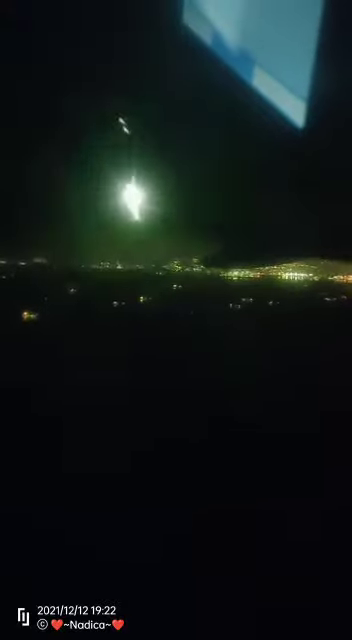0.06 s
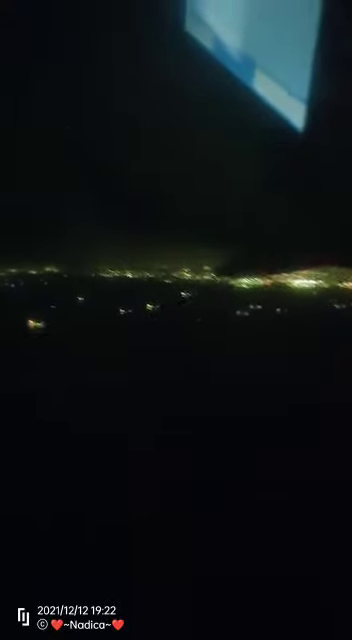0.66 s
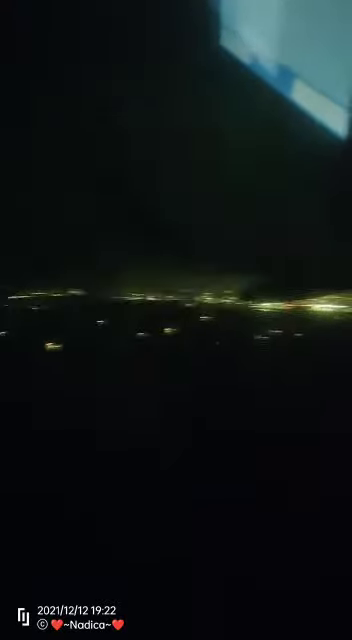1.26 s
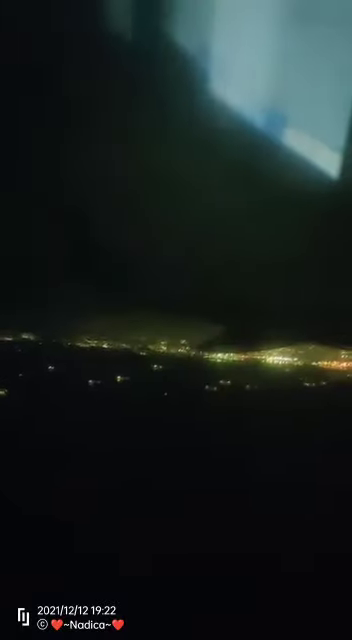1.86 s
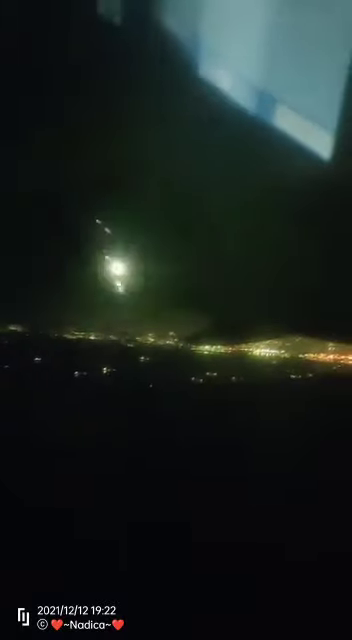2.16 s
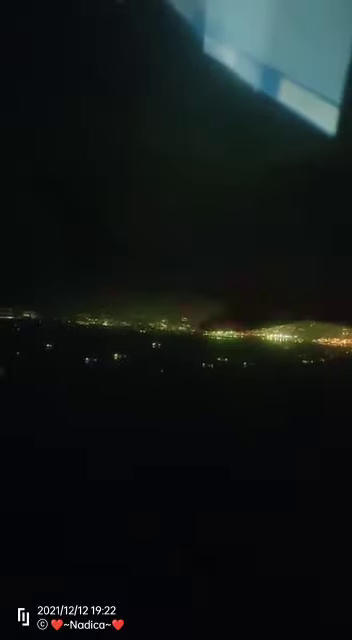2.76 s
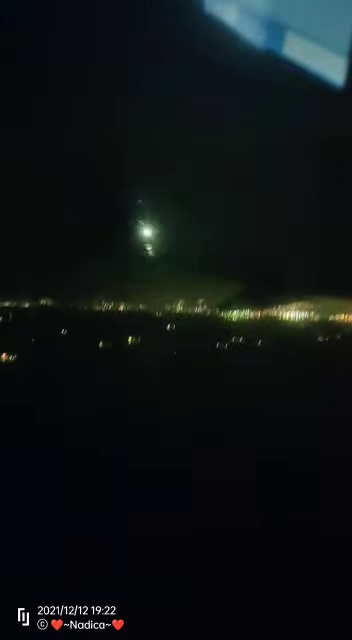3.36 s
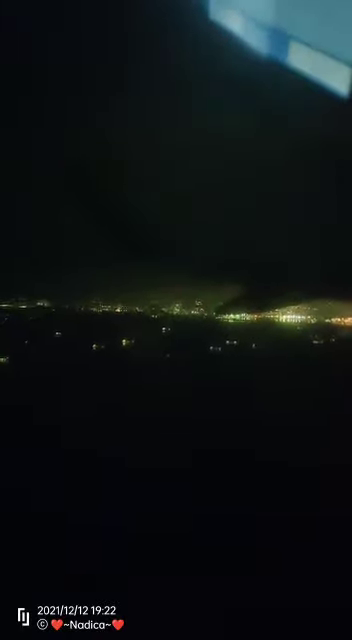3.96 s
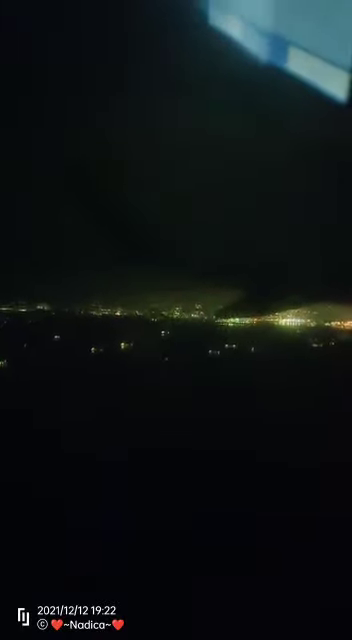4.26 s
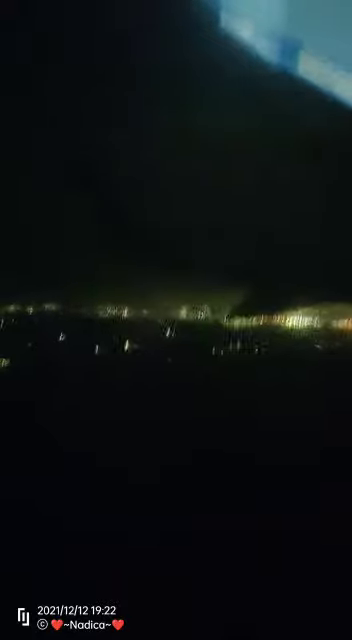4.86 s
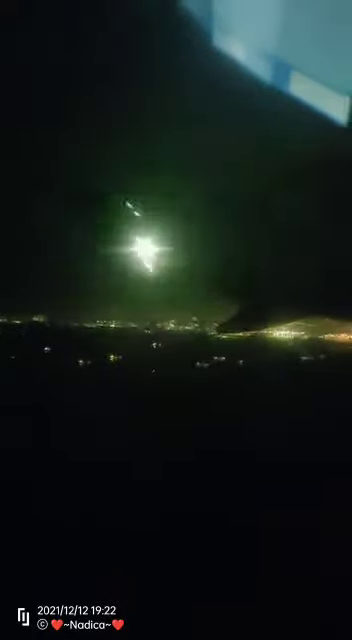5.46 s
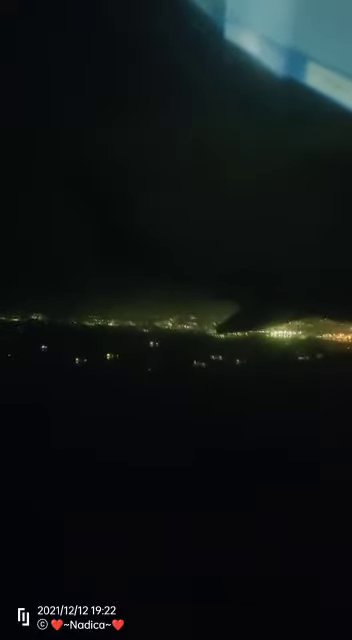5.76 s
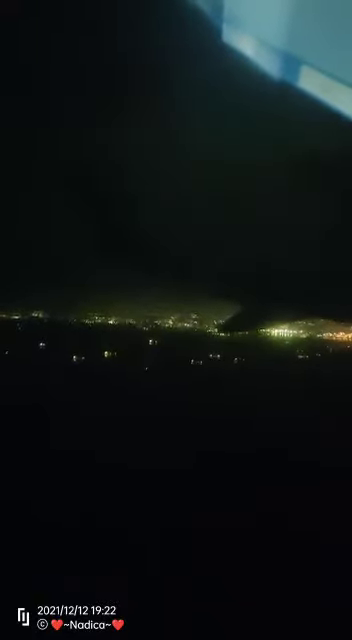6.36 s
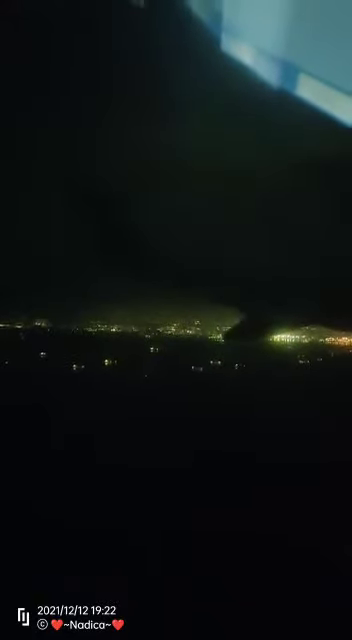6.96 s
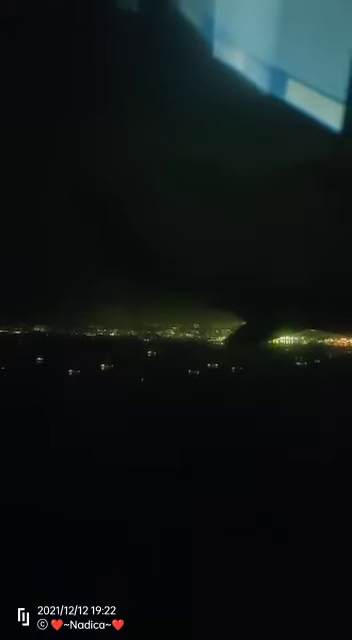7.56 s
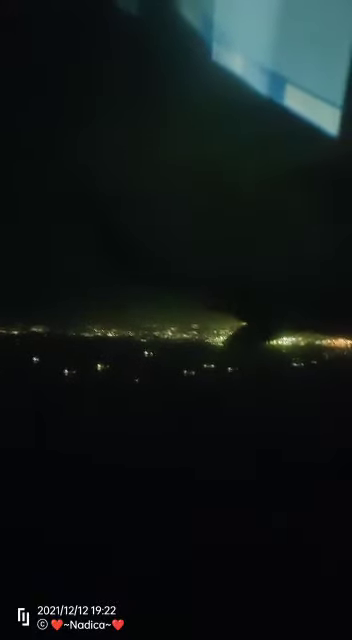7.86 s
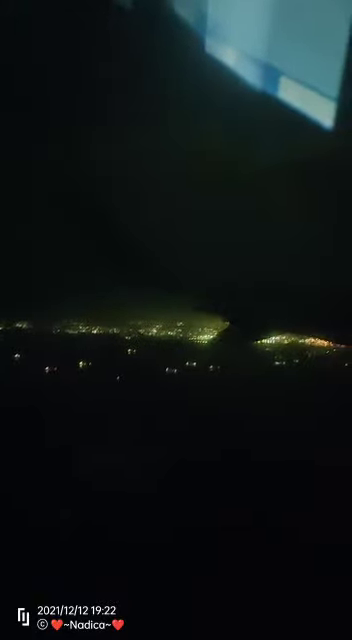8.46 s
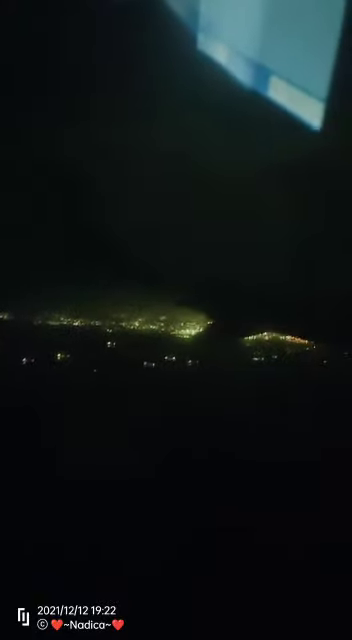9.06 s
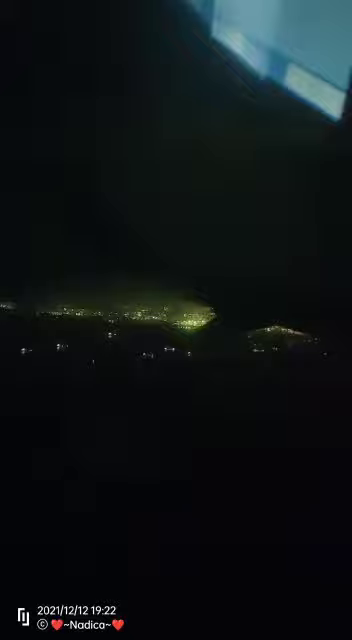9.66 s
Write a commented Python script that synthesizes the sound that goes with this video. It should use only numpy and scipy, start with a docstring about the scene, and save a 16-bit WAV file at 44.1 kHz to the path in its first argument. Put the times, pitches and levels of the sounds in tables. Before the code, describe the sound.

A low, steady engine roar fills an airliner cabin, heard from a window seat along with hissing vents and a faint hum. Midway comes a quick double click of hard plastic close by, followed by light hand brushes, a soft bump and a faint rustle of clothing. The air rushing past on the right swells a little and later whistles softly.

```python
"""Night flight at a window seat

The engines rumble through the airliner's body and hum faintly. Air hisses from the vents and rushes
along the outside, where it swells and later starts to whistle softly. Around halfway, fingertips tick
and hard plastic clicks close by, then a hand brushes and bumps lightly and cloth rustles faintly."""
import sys
import numpy as np
from scipy import signal
from scipy.fft import rfft, irfft, next_fast_len
from scipy.io import wavfile
from scipy.ndimage import uniform_filter1d, map_coordinates

SR = 44100
rng = np.random.default_rng(int(sys.argv[2]) if len(sys.argv) > 2 else 0)


def master_out(mix):
    """Clip the mix to full scale and print it as 16-bit PCM to the path in sys.argv[1]."""
    frames = np.transpose(np.atleast_2d(mix))
    ceiling = np.clip(frames, -1, 1)
    pcm = np.round(ceiling * 32767).astype(np.int16)
    wavfile.write(sys.argv[1], SR, pcm)


N = 427769
TIME = np.arange(N) / SR  # seconds
TOP_HZ = 15700  # where the treble ends


def amp(db):
    """Turns decibels into a number to multiply by."""
    return 10 ** (np.asarray(db) / 20)


def unit(x):
    """Scales a sound to an average (rms) strength of 1."""
    return x / np.sqrt(np.mean(x ** 2) + 1e-20)


def along(points, hz):
    """Reads between a table's rows of frequency and value, on a scale of octaves."""
    f, v = np.transpose(points)
    return np.interp(np.log(hz + 1), np.log(f + 1), v)


def curves(rows):
    """Joins timed rows with straight lines: one curve for each column after the time."""
    times, *columns = np.transpose(rows)
    return [np.interp(TIME, times, column) for column in columns]


def wobble(rate):
    """A smooth random curve through `rate` points a second."""
    return map_coordinates(rng.standard_normal(int(N * rate / SR) + 4), [TIME * rate])


def bell(middle_s, half_s):
    """A smooth rise to 1 and fall around a moment."""
    return np.exp(-2 * ((TIME - middle_s) / half_s) ** 2)


def bursts(rows, fade_s):
    """Sudden jumps in level, each falling 60 dB in fade_s seconds."""
    return sum((TIME >= s) * amp(db - 60 * np.abs(TIME - s) / fade_s) for s, db in rows)


def filtered(x, response):
    """Turns each frequency of a sound up or down by response(hz)."""
    size = next_fast_len(N + SR // 2)
    return irfft(rfft(x, size) * response(np.fft.rfftfreq(size, 1 / SR)), size)[..., :N]


def humps(resonances, hz):
    """The lift in dB around resonances, the pitches at which something likes to ring."""
    return sum(db / (1 + (2 * (hz - centre) / width) ** 2) for centre, width, db in resonances)


def pan(lean_db):
    """Left and right gains: a positive lean is louder on the left."""
    return amp(np.array([[.5], [-.5]]) * lean_db)


# How alike left and right sound; they oppose where half a wave fits between them.
# Each row: frequency in Hz, likeness from -1 (opposite) to 1 (the same).
LIKENESS = [(60, .99), (130, .99), (290, .93), (520, .75), (640, .35), (880, .3), (1030, .45), (1190, -.38),
            (1620, -.35), (1780, .17), (2500, .17), (3200, -.07), (4200, .08), (15000, .02)]
# Which side is louder. Each row: frequency in Hz, left minus right in dB.
SIDE_LEAN = [(50, 0), (120, 0), (250, 1.5), (450, 1), (580, 3.5), (700, 1), (910, -0.2), (1030, 3.5),
             (1140, 0), (1250, 3.5), (1420, -.5), (2070, -2), (2290, 3.5), (2650, 0.5), (3400, -6.5),
             (4100, -4), (4600, -6), (8000, -3), (15000, -1.5)]
def cabin_noise(colour):
    """Noise all around, shaped by colour(hz) in dB: alike on both sides in the bass, not in the treble."""
    def mid_and_side(hz):
        angle = np.arccos(np.clip(along(LIKENESS, hz), -1, 1)) / 2
        return amp(colour(hz)) * [np.cos(angle), np.sin(angle)]
    mid, side = filtered(rng.standard_normal((2, N)), mid_and_side)
    left_right = np.array([mid + side, mid - side])
    return unit(filtered(left_right, lambda hz: pan(along(SIDE_LEAN, hz))))


def table_noise(shape, resonances=()):
    """Cabin noise shaped by a table of frequencies and levels, plus any resonances."""
    return cabin_noise(lambda hz: along(shape, hz) + humps(resonances, hz))


def steadied(x, evenness):
    """Partly evens out the slow swells of a noise, as in a steadily driven vibration."""
    power = np.abs(uniform_filter1d(np.mean(x ** 2, axis=0), size=SR // 12))
    return unit(x / (power + 1e-3) ** (evenness / 2))


def tone(hz, drift_hz, flutter_db):
    """A single note that can waver in pitch and strength."""
    phase = 2 * np.pi * np.cumsum(hz + drift_hz * wobble(9)) / SR
    return unit(np.sin(phase) * amp(flutter_db * wobble(5.1)))


# The deep rumble of the plane's body. Each row: frequency in Hz, relative level in dB.
RUMBLE_SHAPE = [(10, -40), (19, -22.5), (27, -21.5), (35, -13.5), (42, -6.5), (48, 4), (55, -1.5),
                (62, -3.5), (72, -7.5), (80, -9), (110, -37), (200, -100)]
# Its brief swells. Each row: middle in seconds, lift in dB.
RUMBLE_SWELLS = [(.8, 8), (2.31, 8), (3.1, 4), (3.43, 6), (3.61, 4), (4.0, 5.5), (4.5, 7), (5.28, 4),
                 (6.35, 3), (6.98, 8), (9.2, 8.5)]
def rumble():
    """The engines shake the plane's body; the level wanders and briefly swells."""
    level_db = -24.5 + 1.4 * wobble(7)
    swells_db = sum(db * bell(s, half_s=.061) for s, db in RUMBLE_SWELLS)
    return amp(level_db + swells_db) * steadied(table_noise(RUMBLE_SHAPE), evenness=.24)


# The engines through the walls. Each row: frequency in Hz, relative level in dB.
ROAR_SHAPE = [(50, -44), (72, -12.5), (88, -4), (130, -3), (185, -1), (240, -6.5), (320, -13), (390, -17),
              (510, -22), (620, -25), (870, -29.5), (1040, -34), (1300, -42), (2400, -71.5)]
# Where the cabin rings. Each row: frequency in Hz, width in Hz, lift in dB.
CABIN_RESONANCES = [(125.8, 15, 3), (187.4, 33, 3), (238.8, 13, 4.5), (298.8, 9.8, 4), (523, 46, 4.5),
                    (723, 96, 2), (1034, 124, 6)]
def roar():
    """Steady engine noise comes through the walls, and the cabin lifts some pitches."""
    return amp(-20.5) * steadied(table_noise(ROAR_SHAPE, CABIN_RESONANCES), evenness=.3)


# The engine's note. Each row: time in seconds, pitch in Hz, level in dB.
HUM_PATH = [(0, 492, -47), (1, 489, -51), (1.9, 489, -47), (2.3, 487, -38), (2.7, 484, -40.5),
            (3.2, 481.5, -44), (3.9, 484, -53), (4.35, 486, -42.5), (5.1, 480, -43), (5.6, 478, -50),
            (6, 475, -45), (6.6, 468, -45.5), (7.3, 464, -48), (8.8, 461, -50), (9.3, 458, -41.5),
            (9.7, 456, -39.5)]
def hum():
    """A faint note comes and goes, sinking as the engine shafts slow."""
    hz, db = curves(HUM_PATH)
    return amp(db) * tone(hz, drift_hz=.9, flutter_db=1.7) * pan(2.5)


# A narrow band of engine noise. Each row: frequency in Hz, relative level in dB.
DRONE_SHAPE = [(380, -71.5), (465, -14.5), (515, 3), (565, -16), (700, -71)]
def drone():
    """A blurred engine note draws back for a while, then returns."""
    level_db = -42.5 - 7 * bell(middle_s=3.1, half_s=4.4)
    return amp(level_db) * steadied(table_noise(DRONE_SHAPE), evenness=.28)


# The hiss of the vents. Each row: frequency in Hz, relative level in dB.
VENT_SHAPE = [(650, -29.5), (1080, -10), (1200, -2), (1410, -2.5), (1650, -.5), (1950, 0.5), (2330, -2.5),
              (2880, -4), (3080, -4), (3500, -2), (4080, -2.5), (5160, -10.5), (5900, -12.5), (6910, -19.5),
              (14100, -47), (16000, -53.5)]
# Where the air ducts ring. Each row: frequency in Hz, width in Hz, lift in dB.
DUCT_RESONANCES = [(1900, 99, 2.5), (4100, 330, 4), (5750, 240, 5)]
# How loud the vents are. Each row: time in seconds, level in dB.
VENT_LOUDNESS = [(0, -43.5), (1.3, -41), (3, -41), (4.2, -42), (5.1, -42), (6.3, -42), (7.8, -42.5),
                 (9.7, -41.5)]
def vents():
    """Air hisses out of the vents, coloured by the ducts behind them."""
    db, = curves(VENT_LOUDNESS)
    return amp(db + .69 * wobble(7.3)) * table_noise(VENT_SHAPE, DUCT_RESONANCES)


# The rush of outside air. Each row: frequency in Hz, relative level in dB.
SLIPSTREAM_SHAPE = [(700, -31), (1050, -12), (1270, -1), (1500, -3.5), (1700, -1), (1900, 3), (2250, 0),
                    (2600, -5.5), (3000, -25), (5000, -55)]
# How loud it is. Each row: time in seconds, level in dB.
SLIPSTREAM_LOUDNESS = [(0, -49.5), (1.1, -56), (1.7, -50), (3, -48), (4, -49), (6, -42.5), (9.7, -43.5)]
def slipstream():
    """Air rushes along the window on the right, dips, then swells."""
    db, = curves(SLIPSTREAM_LOUDNESS)
    return amp(db + .74 * wobble(13)) * table_noise(SLIPSTREAM_SHAPE) * pan(-7)


# A low throb. Each row: frequency in Hz, relative level in dB.
THROB_SHAPE = [(60, -120), (110, -40), (160, -3.5), (185, 9.5), (210, -1), (320, -55.5), (600, -120)]
# Its brief swells. Each row: middle in seconds, level in dB.
THROB_SWELLS = [(.15, -19), (.55, -23), (1.82, -23.5), (2.03, -21.5), (3.68, -19), (4.5, -24.5), (5.2, -29),
                (6.9, -17.5), (7.8, -21.5)]
def throb():
    """A low throb near 185 Hz swells briefly now and then within the roar."""
    swells = sum(amp(db) * bell(s, half_s=.052) for s, db in THROB_SWELLS)
    return swells * steadied(table_noise(THROB_SHAPE), evenness=.9)


# One vent's narrow hiss. Each row: frequency in Hz, relative level in dB.
JET_SHAPE = [(2500, -40), (3400, -7.5), (4050, 1.5), (4500, -10.5), (6000, -24), (9000, -59.5)]
def vent_jet():
    """A thin jet of air from one vent swells and fades."""
    return amp(-50) * bell(middle_s=3.2, half_s=2.8) * table_noise(JET_SHAPE) * pan(-5.5)


# Turbine notes. Each row: middle and half length in seconds, pitch at the middle in Hz, level in dB.
TURBINE_NOTES = [(1.7, .9, 1172, -58.5), (4.9, 1.4, 1103, -56.5)]
def whine(fall_hz_per_s=14):
    """A thin turbine whine comes up twice, slowly falling in pitch."""
    out = np.zeros(N)
    for s, half_s, hz, db in TURBINE_NOTES:
        pitch = hz - fall_hz_per_s * (TIME - s)
        out += amp(db) * bell(s, half_s) * tone(pitch, drift_hz=2, flutter_db=0)
    return out


# Catches of a fingertip. Each row: start in seconds, level in dB.
FINGER_CATCHES = [(2.459, -62), (4.156, -60.5), (4.180, -58.5), (4.207, -59.5), (4.223, -60.5),
                  (4.280, -62.5), (4.308, -62.5)]
def finger_ticks(low_edge_hz=6500):
    """Each catch of a fingertip is a tiny burst of treble that dies at once."""
    noise = rng.standard_normal((2, N))
    fizz = filtered(noise, lambda hz: (hz < TOP_HZ) * hz ** 4 / (hz ** 4 + low_edge_hz ** 4))
    return bursts(FINGER_CATCHES, fade_s=.07) * unit(fizz) * pan(-11)


def sharpest_snap(shape, size):
    """The shortest snap with the given mix of frequencies, scaled to a peak of 1."""
    gains = amp(along(shape, np.fft.rfftfreq(size, 1 / SR)))
    cepstrum = irfft(np.log(gains), size)
    first_half = 2 * cepstrum * (np.arange(size) < size // 2)  # packs the energy at the start
    snap = irfft(np.exp(rfft(first_half) - cepstrum[0]), size)
    return snap / np.abs(snap).max()


# Plastic contacts. Each row: start in seconds, level in dB, left minus right in dB,
# frequency in Hz above which it is dulled, seconds for its echoes to fall 60 dB.
PLASTIC_CONTACTS = [(4.7448, -17.5, -8, 3800, .009), (4.7473, -23, -6, 3000, .009),
                    (4.7552, -25, -3, 1500, .008), (4.7566, -22, -7, 4000, .010),
                    (4.8263, -10.5, -3, 13000, .023)]
# How the plastic rings. Each row: pitch in Hz, relative level in dB, seconds to fall 60 dB.
PLASTIC_RINGS = [(725, -3, .035), (1039, -4, .1), (1674, -2, .026), (1981, -3, .045), (2137, -6, .04),
                 (2780, 2, .024), (5669, -4, .02), (6180, -11, .03)]
# The dry crack of a contact. Each row: frequency in Hz, relative level in dB.
SNAP_SHAPE = [(200, -22), (550, 4.5), (800, 4.5), (1050, -2), (1350, -9), (1680, -1.5), (2300, -4.5),
              (2800, 5), (3300, -1), (3850, -5), (4400, 0), (5100, -8), (5900, -2), (7200, -17),
              (9000, -24), (15000, -26)]
def plastic_clicks(echo_db=-10, ring_db=-13, left_delay_s=.00055):
    """Each contact snaps, rings briefly and echoes off nearby panels; light contacts are duller."""
    out, t = np.zeros((2, N)), np.arange(SR // 8) / SR
    hz, pitch_db, ring_s = np.transpose(PLASTIC_RINGS)[:, :, None]
    snap = sharpest_snap(SNAP_SHAPE, size=1024)
    for s, db, lean_db, bright_hz, echo_s in PLASTIC_CONTACTS:
        strength_db = pitch_db + rng.standard_normal((2, len(hz), 1))
        ring = np.sum(amp(strength_db - 60 * t / ring_s) * np.sin(2 * np.pi * hz * t), axis=1)
        direct = t == 0
        echoes = amp(echo_db - 60 * t / echo_s) * rng.standard_normal((2, len(t)))
        contact = signal.lfilter(snap, 1, direct + echoes) + amp(ring_db) * ring
        dulled = signal.lfilter(*signal.butter(1, bright_hz, fs=SR), contact)
        left, right = amp(db) * pan(lean_db) * dulled
        out[0, round((s + left_delay_s) * SR):][:len(t)] += left
        out[1, round(s * SR):][:len(t)] += right
    return out


# Light touches of a hand. Each row: middle and half length in seconds, level in dB,
# centre frequency in Hz, reach either side of it in octaves, left minus right in dB.
HAND_TOUCHES = [(4.922, 0.028, -40.5, 4200, 0.5, -12), (5.404, 0.015, -41.5, 5700, 0.27, -5),
                (6.328, .016, -36.5, 950, 0.6, 3)]
def hand_brushes_and_bumps(grain_db=1):
    """Two light brushes and a soft bump, each a short swell of grainy noise."""
    out, t = np.zeros((2, N)), np.arange(-SR // 2, SR // 2) / SR
    hz = np.fft.rfftfreq(len(t), 1 / SR)
    for s, half_s, db, centre_hz, octaves, lean_db in HAND_TOUCHES:
        band = 1 / (1 + (np.log2((hz + 1) / centre_hz) / octaves) ** 4) ** .5
        band /= 1 + (hz / centre_hz / 10) ** 2  # less treble
        band /= 1 + (.5 * centre_hz / (hz + 1)) ** 2  # less bass
        grains = amp(grain_db * np.repeat(rng.standard_normal(len(t)), 64)[:len(t)])  # 64 samples each
        noise = unit(irfft(rfft(grains * rng.standard_normal((2, len(t)))) * band, len(t)))
        swell = np.exp(-2 * (t / half_s) ** 2)
        out[:, round((s - .5) * SR):][:, :len(t)] += amp(db) * pan(lean_db) * swell * noise
    return out


# Strokes of cloth. Each row: middle and half length in seconds, level in dB.
CLOTH_STROKES = [(6.02, 0.4, -48.5), (6.516, 0.25, -48), (7.148, 0.75, -49.5), (7.85, 0.37, -57),
                 (8.702, 1, -53.5), (9.55, 0.32, -56)]
# Sliding cloth. Each row: frequency in Hz, relative level in dB.
CLOTH_SHAPE = [(500, -28), (1200, -0.5), (2500, -9.5), (4600, 9.5), (6500, 3.5), (8500, -20),
               (14000, -29.5), (16000, -22.5)]
# Snapping fibres. Each row: frequency in Hz, relative level in dB.
FIBRE_SHAPE = [(2000, -15), (5000, 2), (7000, 3), (9000, -14), (15000, -19)]
def cloth_rustle(catch_db=.9, grain_db=2.5, crackle_db=-10, snaps_per_s=110, fade_s=.033):
    """Cloth slides in uneven little catches made of fine grains; single fibres crackle on top."""
    strokes = sum(amp(db) * bell(s, half_s) for s, half_s, db in CLOTH_STROKES)
    friction = amp(catch_db * wobble(22) + grain_db * wobble(370))
    snaps = (rng.random(N) < snaps_per_s / SR) * rng.uniform(.2, 1, N)
    fading_snaps = signal.lfilter([1], [1, -amp(-60 / (fade_s * SR))], snaps)
    crackle = amp(crackle_db) * unit(fading_snaps * table_noise(FIBRE_SHAPE))
    sliding = unit(friction * table_noise(CLOTH_SHAPE))
    return strokes * (sliding + crackle) * pan(2.2)


# Snags in the cloth. Each row: start in seconds, level in dB.
CLOTH_SNAGS = [(5.831, -44), (6.056, -45), (6.383, -45), (6.570, -44), (6.600, -42), (6.625, -42),
               (7.004, -44), (7.089, -45), (7.190, -44), (7.295, -45)]
def cloth_snags():
    """Now and then the cloth snags and lets go with a short, dry scratch."""
    return bursts(CLOTH_SNAGS, fade_s=.018) * table_noise(FIBRE_SHAPE)


def whistle(start_s=7.15, rise_s=.12):
    """A breathy whistle grows out of the slipstream and stays."""
    def colour(hz):
        octaves_away = np.abs(np.log2((hz + 1) / 2250))
        return humps([(2240, 840, 33)], hz) - 12 * octaves_away
    fade_in = .5 + .5 * np.tanh((TIME - start_s) / rise_s)
    return amp(-50 + 1.1 * wobble(4.1)) * fade_in * cabin_noise(colour) * pan(-12.5)


def scene():
    """Small handling sounds close by, over the engines and the moving air."""
    handling = plastic_clicks() + cloth_rustle() + cloth_snags()
    engines = rumble() + roar() + hum() + drone() + whine() + throb()
    air = vents() + slipstream() + whistle() + vent_jet()
    return handling + engines + air + hand_brushes_and_bumps() + finger_ticks()


def record(dry):
    """Fades the sound in over 4 milliseconds and cuts off the highest treble."""
    fade_in = np.minimum(TIME / .004, 1)
    treble_cut = signal.ellip(10, .1, 80, TOP_HZ, fs=SR, output="sos")
    return signal.sosfilt(treble_cut, dry * fade_in)


dry = scene()
out = record(dry)
master_out(out)
```